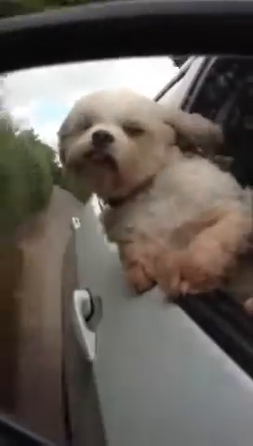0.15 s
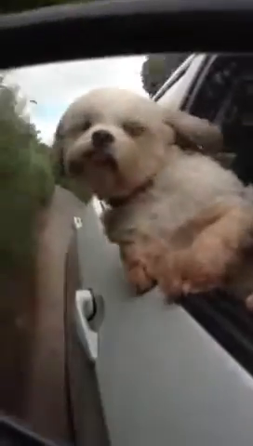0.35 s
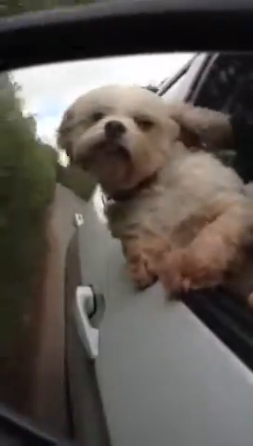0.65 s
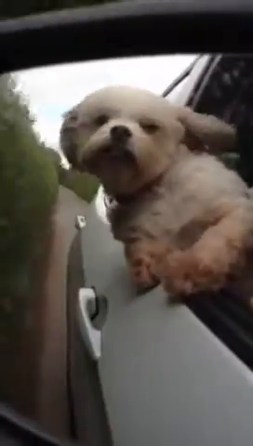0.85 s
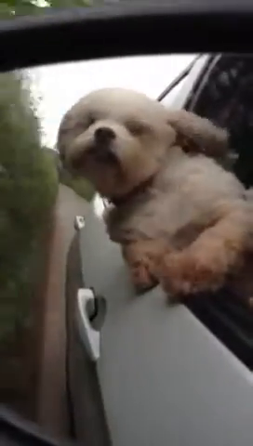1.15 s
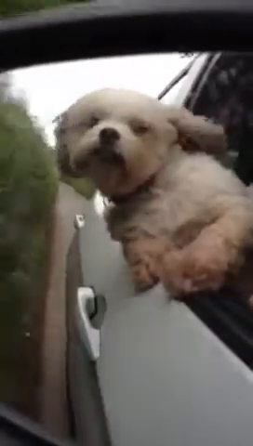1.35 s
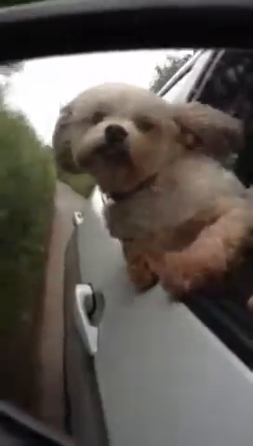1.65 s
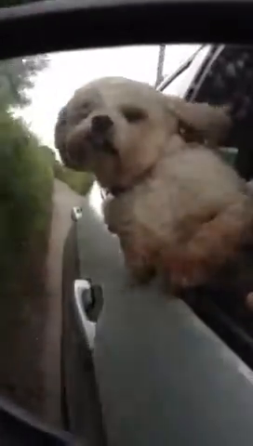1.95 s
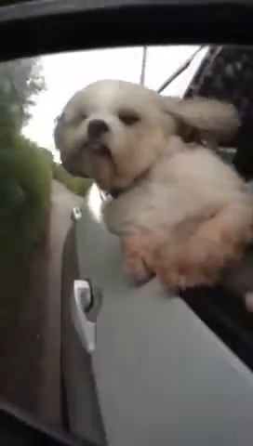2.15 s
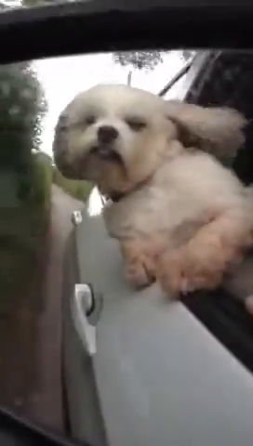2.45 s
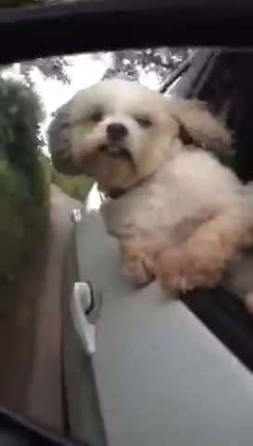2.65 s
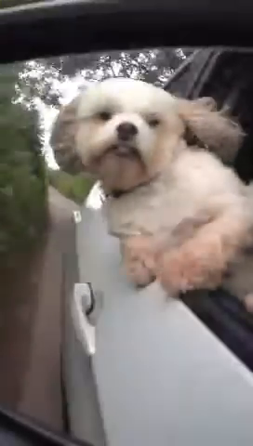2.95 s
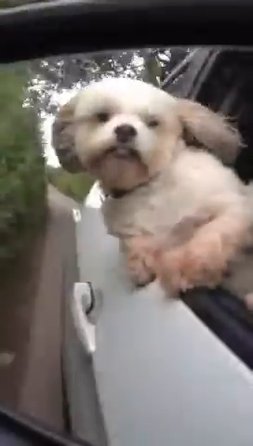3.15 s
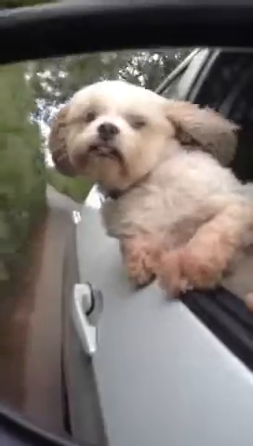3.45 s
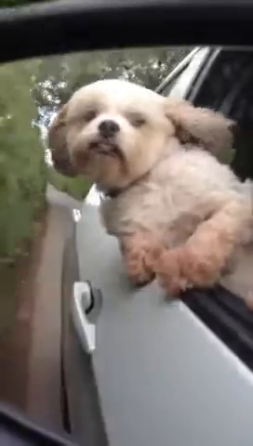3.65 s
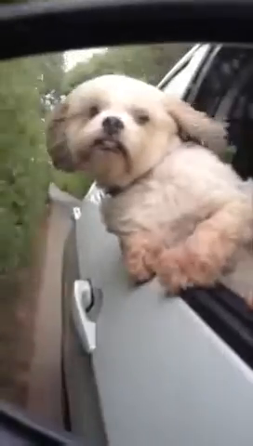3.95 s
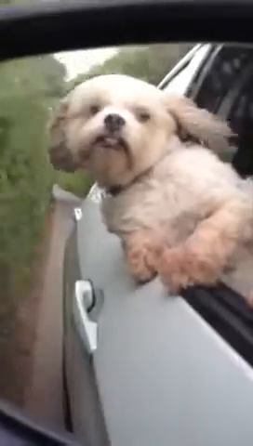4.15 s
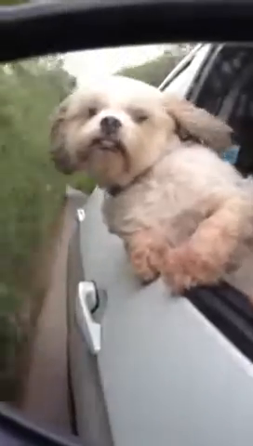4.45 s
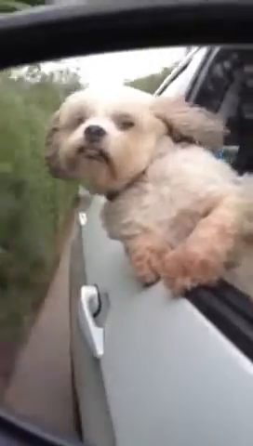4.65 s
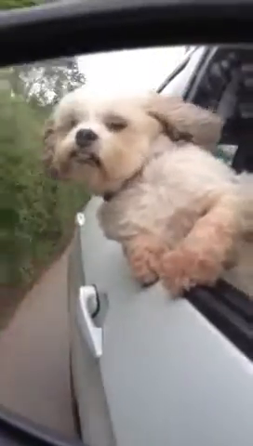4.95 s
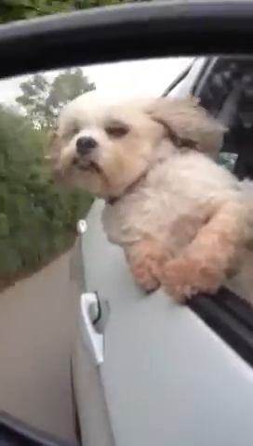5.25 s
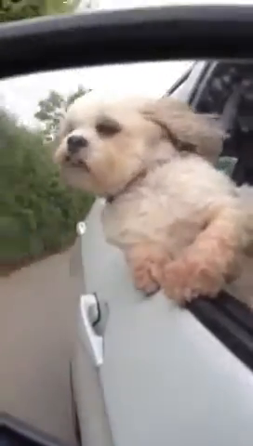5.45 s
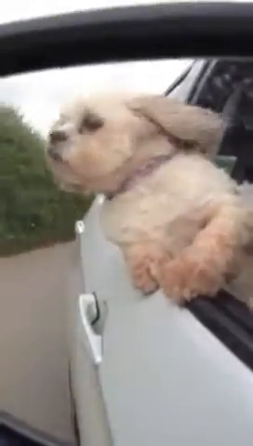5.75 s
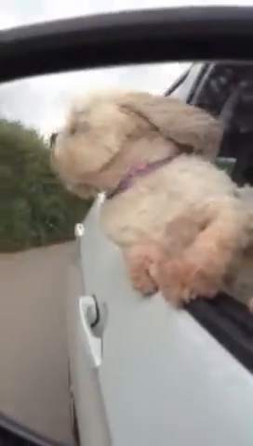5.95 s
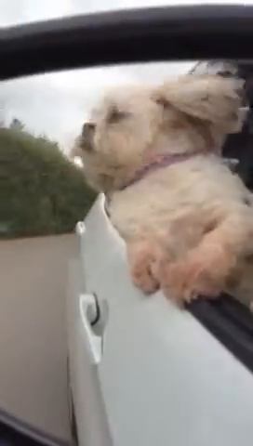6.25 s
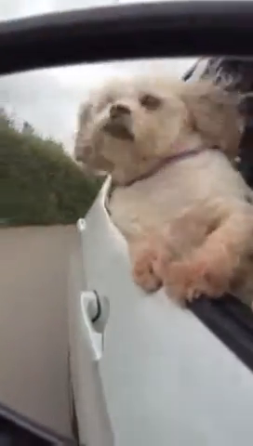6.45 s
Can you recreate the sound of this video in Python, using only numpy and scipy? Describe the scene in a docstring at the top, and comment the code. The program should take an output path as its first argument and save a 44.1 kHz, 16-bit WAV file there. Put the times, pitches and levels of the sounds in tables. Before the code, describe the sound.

Rough slipstream thumps and crackles past an open car window in uneven puffs, above low road rumble and faint hiss, slowly easing off.

```python
"""First heard is a deep, uneven buffeting: the slipstream at the open window of a moving car strikes a microphone.
It is turbulence, noise whose large and small eddies swell in short puffs between lulls and weaken as the car slows.
Sharp snaps are pressure steps that leak away; beneath lie tyre roar and hiss, slowly fading, slightly
wavering shaped noise.
The microphone rounds off the loudest peaks by saturation and cuts the deepest bass."""
import sys
import numpy as np
from scipy import signal
from scipy.fft import rfft, irfft, next_fast_len
from scipy.io import wavfile
from scipy.ndimage import uniform_filter1d, map_coordinates

SR = 44100
rng = np.random.default_rng(int(sys.argv[2]) if len(sys.argv) > 2 else 0)


def voltage_ratio(level):
    """Linear amplitude factor for a level in decibels (scalar or array-like)."""
    return 10 ** (np.asarray(level, float) / 20)


def master_out(mix):
    """Clip the mix to full scale and print it as 16-bit PCM to the path in sys.argv[1]."""
    frames = np.transpose(np.atleast_2d(mix))
    ceiling = np.clip(frames, -1, 1)
    pcm = np.round(ceiling * 32767).astype(np.int16)
    wavfile.write(sys.argv[1], SR, pcm)


N = 291060
TIME = np.arange(N) / SR  # s

# How deeply the level of each size of eddy follows a lull, dB per dB of its depth
LULL_SMALL, LULL_LARGE = 1.26, 1.6

# Relative mean spectrum of the turbulence at the port: (frequency [Hz], level [dB per Hz])
EDDY_SPECTRUM = [(15, -53), (25, -31), (59, -25), (152, 0.8), (227, 0.8), (330, -2.5), (500, -8),
                 (848, -14.5), (2000, -28.5), (5010, -45), (7500, -54), (9810, -65.5), (14300, -62.5),
                 (15500, -74)]
# Share of the level that follows the small eddies, the rest the large: (frequency [Hz], share [0 up, may pass 1])
SMALL_EDDY_SHARE = [(60, 0.18), (150, 0.047), (250, 0.16), (450, 0.47), (800, 0.78), (1600, 1.16),
                    (3200, 1.086), (8000, 1.18)]


def buffet(minor):
    """Turbulence as a cascade of eddy sizes: the finer the eddy, the more it follows the fast air."""
    calm_large_db, calm_small_db = -3.5, -2.5  # air between puffs, against the stream
    flutter = wobble(60)
    # Faster air tilts the treble up: dB per octave above 1.5 kHz, changing with each dB of stream
    bright = 1.07 + 0.59 * stream_change_db()

    # The offsets bring both levels to about zero in an average gust
    large = gusting(stream(column=1) + calm_large_db, minor, column=2, lull=LULL_LARGE, stretch=0.59)
    large = large + 15.5 + 1.57 * flutter
    small = gusting(stream(column=2) + calm_small_db, minor, column=1, lull=LULL_SMALL, stretch=0.6)
    small = small + 21 + 0.97 * flutter + 3.6 * wobble(200)
    small = np.minimum(small, 12)

    noise, out = rng.standard_normal(N), np.zeros(N)
    ticks = noise * voltage_ratio(8.5 * wobble(320) + 6.3 * wobble(400))  # fine eddies come as separate ticks
    ticks /= np.sqrt(np.abs(uniform_filter1d(ticks ** 2, size=350)))  # evens the energy over about 8 ms

    for hz in 30 * 2 ** (np.arange(19) / 2):  # half-octave steps
        share = along(SMALL_EDDY_SHARE, hz)
        ticking = np.clip(share - .3, 0, 1)
        air = np.sqrt(1 - ticking) * noise + np.sqrt(ticking) * ticks
        eddy = filtered(air, lambda f: eddy_band(f, hz) * voltage_ratio(along(EDDY_SPECTRUM, f)))
        # The puffs, more than chance, set the size of large eddies
        power = np.abs(uniform_filter1d(eddy ** 2, size=int(3 * SR / hz) + 200)) / np.mean(eddy ** 2)
        eddy /= (power + 0.099) ** (0.24 * (1 - ticking))
        tilt_db = bright * max(np.log2(hz / 1500), 0)
        level_db = (1 - share) * large + share * small + tilt_db + 1.06 * wobble(25)
        out += eddy * voltage_ratio(level_db)
    return voltage_ratio(5.5) * out


def eddy_band(f, hz):
    """Band-pass principle: a triangle on the log-frequency axis, half an octave to each side of hz."""
    return np.clip(1 - np.abs(2 * np.log2((f + 1) / hz)), 0, 1)


# Puffs at set times, strong and faint:
# (time [s], small-eddy level [dB], large-eddy level [dB], nominal length [ms])
SET_PUFFS = [(0.044, -19, -7.5, 7.9), (0.135, -16, -6, 7.1), (0.234, -19.5, -6, 15.3),
             (0.316, -12, -10, 10.9), (0.362, -10, -5, 4.2), (0.393, -13, -7, 18),
             (0.425, -16.0, -7.5, 9.9), (0.505, -13, -12.5, 5.2), (0.547, -16, -10, 13.3),
             (0.593, -15, -8, 5.1), (0.637, -16, -13.5, 5.0), (0.677, -15.5, -6.5, 6.6),
             (0.726, -6, -11, 5.9), (0.765, -19, -12, 3.6), (0.812, -16.0, -6, 6), (0.841, -14.5, -12, 21),
             (0.893, -19.5, -10.0, 4.1), (0.986, -15.5, -14, 17), (1.046, -14.5, -11, 16.1),
             (1.136, -10, -2.5, 4.6), (1.169, -11.5, -2, 4.7), (1.228, -18, -6.5, 5.4),
             (1.301, -15, -10.5, 6.0), (1.485, -15, -11.5, 3.4), (1.514, -15, -10.0, 4.8),
             (1.547, -16.5, -15.5, 10), (1.609, -27.5, -16, 7.7), (1.677, -10.5, -27.5, 5.8),
             (1.699, -14.5, -14.5, 5.5), (1.763, -14.5, -10, 8.2), (1.88, -12.5, -14, 11.8),
             (1.926, -10.5, -13, 3.9), (1.964, -15.5, -14.0, 11), (2.043, -18.5, -16.5, 23),
             (2.088, -17.5, -8, 7.9), (2.127, -16, -11.5, 2.8), (2.159, -16.5, -4.5, 7.4),
             (2.213, -24, -9, 6.8), (2.297, -15.5, -19, 5.6), (2.344, -16.5, -17.5, 3.1),
             (2.443, -13, -12.5, 4.9), (2.573, -6.5, -22, 2.7), (2.598, -14.5, -24, 4.0),
             (2.686, -15, -15, 6.8), (2.724, -15.5, -7.5, 3.8), (2.757, -22.5, -16, 3.9),
             (2.861, -19.5, -9.0, 21), (2.931, -16.5, -16.5, 5.3), (2.983, -14.5, -6, 6.7),
             (3.026, -18, -18.5, 8.2), (3.106, -11, -18.5, 5.9), (3.168, -21, -9, 5.1),
             (3.234, -16.5, -14.5, 4.9), (3.355, -20.5, -16.5, 20), (3.469, -12, -12, 7.7),
             (3.569, -21, -10.5, 27), (3.638, -20.5, -8.5, 9.1), (3.797, -18, -12.5, 6.7),
             (3.835, -20.5, -10.5, 9.8), (3.945, -15.5, -22, 3.1), (3.977, -23, -10.5, 4.8),
             (4.058, -23.5, -8.5, 13), (4.102, -20, -6.5, 6.6), (4.208, -24, -12, 4.1),
             (4.248, -16.5, -14, 6.2), (4.344, -20, -3, 5.6), (4.43, -22.5, -25, 4.1),
             (4.468, -19, -6, 8.7), (4.522, -12.5, -6.5, 3.8), (4.552, -29, -8.5, 3.2),
             (4.584, -18.5, -16, 8.4), (4.637, -19.5, -9.5, 13), (4.664, -16.5, -11, 4.4),
             (4.717, -32, -18, 2.4), (4.782, -23.5, -13.5, 11.6), (4.827, -24.5, -17, 22),
             (4.895, -28, -9, 13), (4.964, -23, -8, 7.0), (4.998, -26.5, -15, 6.1), (5.025, -21.5, -5, 5.8),
             (5.096, -20.5, -8, 15), (5.127, -32, -6, 4.9), (5.254, -16, -13.5, 4.1), (5.281, -28.5, -7, 4),
             (5.306, -33, -9, 3.5), (5.328, -19, -10, 11), (5.386, -32.5, -11, 2.1),
             (5.452, -27.5, -8.5, 5.3), (5.473, -26.5, -4.5, 6.6), (5.532, -26, -9, 7.2),
             (5.578, -34.5, -20, 3.4), (5.615, -18.5, -10.0, 11), (5.656, -32, -23.0, 2.3),
             (5.697, -18.5, -10, 6.5), (5.728, -27.5, -16, 6.2), (5.791, -21, -15.5, 3.9),
             (5.851, -19, -11.5, 4.2), (5.876, -29, -11, 7.9), (5.995, -20, -5, 7.4),
             (6.058, -24, -4.5, 7.2), (6.179, -36.5, -8.5, 6.8), (6.251, -24, -12, 13),
             (6.274, -21, -10, 4.4), (6.34, -15.5, -5, 9.6), (6.366, -22.5, -11, 4.7),
             (6.39, -19.5, -13.5, 3.7), (6.423, -18.5, -6, 9.7), (6.572, -18, -21, 5.3)]
# Brief drops of the air: (time [s], nominal depth [dB], nominal length [ms])
LULLS = [(0.202, 11, 4.5), (0.296, 5.5, 15), (0.451, 10, 11), (0.882, 0, 13), (1.117, 6, 17),
         (1.159, 7, 7.3), (1.217, 11.5, 7.9), (1.402, 9, 5.4), (1.577, 7, 11), (1.639, 33, 5.6),
         (1.74, 10.5, 41), (2.013, 7, 20), (2.185, 8.5, 30), (2.486, 5, 20), (2.645, 16, 4.5),
         (3.084, 10, 21), (3.154, 11.5, 9), (3.211, 19, 12), (3.307, 5.5, 17), (3.427, 3.5, 12.6),
         (3.523, 3.5, 10), (3.661, 9, 12), (4.041, 10.5, 4.7), (4.155, 28, 3.7), (4.388, 9.5, 3.8),
         (4.757, 6, 4.4), (4.799, 6, 9.7), (4.856, 8.5, 15.4), (4.943, 17, 8.5), (5.197, 22, 21),
         (5.294, 21, 9.9), (5.402, 16, 15), (5.499, 5.5, 19), (5.643, 9.5, 26.7), (5.754, 12.0, 13),
         (5.838, 12, 25), (5.945, 8, 14), (6.042, 15, 11), (6.156, 23, 13), (6.207, 14, 24.0),
         (6.407, 4, 7.3), (6.498, 6, 35)]


def gusting(calm_db, minor, column, lull, stretch):
    """Addition of powers: stream and lesser puffs, cut by lulls, plus the puffs at set times; gives dB."""
    def swells(puffs):
        return bells([(p[0], voltage_ratio(2 * p[column]), p[3]) for p in puffs], stretch)

    lull_gain = voltage_ratio(-2 * lull * bells(LULLS, stretch=0.71))
    power = (voltage_ratio(2 * calm_db) + swells(minor)) * lull_gain + swells(SET_PUFFS)
    return 10 * np.log10(power)


def minor_puffs():
    """Intermittency of turbulence: random puffs at uneven gaps, sized by the stream; rows as SET_PUFFS."""
    per_s = 24
    small_over_db, large_over_db, scatter_db = 7, 3.5, 3.5  # above the stream; scatter
    typical_ms = 7.05
    count = int(per_s * N / SR)
    s = (np.arange(count) + rng.random(count)) / per_s
    chance, at = rng.standard_normal((count, 3)), np.minimum((s * SR).astype(int), N - 1)
    small = stream(column=2)[at] + small_over_db + scatter_db * chance[:, 0]
    # Large eddies partly share the chance of the small ones
    large_chance = 0.59 * chance[:, 0] + 0.56 * chance[:, 1]
    large = stream(column=1)[at] + large_over_db + scatter_db * large_chance
    return np.transpose([s, small, large, typical_ms * np.exp(0.43 * chance[:, 2])])


# The weakening slipstream: (time [s], large-eddy level [dB], small-eddy level [dB])
SLIPSTREAM = [(0.0, -12, -19), (0.66, -11, -19), (0.99, -11.5, -24.5), (1.67, -11, -24), (2.85, -13, -25.5),
              (3.22, -14.5, -25.5), (3.69, -13.5, -31.5), (3.97, -16, -28), (6.6, -16, -40.5)]


def stream(column):
    """Mean flow under the turbulence: one column of the slipstream, a value per sample."""
    return np.interp(TIME, np.transpose(SLIPSTREAM)[0], np.transpose(SLIPSTREAM)[column])


def stream_change_db():
    """Decay of the mean flow: small-eddy level of the stream against its start, in dB."""
    return stream(column=2) - SLIPSTREAM[0][2]


# Pressure steps at set times, before a common gain: (time [s], level [dB])
SET_SNAPS = [(0.0471, -14), (0.1321, -9.5), (0.157, 0.5), (0.1797, -16), (0.3156, -8.5), (0.3627, -13.5),
             (0.3913, -7.5), (0.5496, -16), (0.5941, -13.5), (0.6144, -18.5), (0.6466, -15.5),
             (0.6728, -11.5), (0.6951, -18.5), (0.7644, -10.5), (0.861, -15.5), (0.9749, -21),
             (0.9877, -19.5), (1.0322, -14), (1.091, -22.5), (1.1337, -22.5), (1.1428, -17.0),
             (1.1857, -15.5), (1.2268, -13.5), (1.27, -27.5), (1.3025, -14), (1.4404, -22.5), (1.484, -13),
             (1.515, -21.5), (1.6772, -16.5), (1.7012, -27.5), (1.7987, -21.5), (1.8828, -15),
             (1.9656, -24), (2.0562, -22.5), (2.1287, -17.5), (2.1509, -24), (2.2119, -22), (2.5703, -8.5),
             (2.5975, -23), (2.7598, -20), (2.8111, -21.5), (2.9354, -19.5), (2.946, -20.5), (3.1069, -22),
             (3.1406, -20), (3.1708, -24.5), (4.5193, -28), (4.6126, -23), (4.7781, -26), (5.098, -26),
             (5.6143, -29.5), (5.6983, -28), (6.2505, -27.5), (6.3384, -36), (6.4392, -30.5),
             (6.5743, -26.5)]
# Colour the port gives a snap: (frequency [Hz], level [dB])
PORT_COLOUR = [(30, -28), (150, -3), (2000, 0.5), (7000, -7), (9500, -25), (12500, -13), (15500, -14)]


def snaps(minor):
    """Impulse into a leaky integrator: the edge of an eddy is a ragged pressure step that leaks away."""
    base_db, grows, scatter_db = -25.5, 0.86, 3  # puff snaps: dB at a -15 dB puff, dB per dB, scatter
    spread_s, follows = .005, 0.64  # scatter about the puff; fade with the stream, dB per dB
    leak_s = 0.0012
    blows = np.zeros(N)

    # Two further snaps go with each puff
    puff_s, puff_db = np.vstack([SET_PUFFS, minor] * 2).T[:2]
    chance = rng.standard_normal((len(puff_s), 2))
    puff_snap_db = base_db + grows * (puff_db + 15) + scatter_db * chance[:, 1]
    puff_snap_db += follows * np.interp(puff_s, TIME, stream_change_db())
    # Lulls hush only the snaps of the random puffs
    of_minor = np.arange(len(puff_s)) % (len(puff_s) // 2) >= len(SET_PUFFS)
    lull_db = np.interp(puff_s, TIME, bells(LULLS, stretch=1.4))
    puff_snap_db -= LULL_SMALL * lull_db * of_minor
    puff_snap_s = puff_s + spread_s * chance[:, 0]
    s, db = np.hstack([np.transpose(SET_SNAPS), [puff_snap_s, puff_snap_db]])

    # Each edge arrives in three parts within 1.6 ms
    late, size = rng.random((len(s), 3)), rng.standard_normal((len(s), 3))
    at = np.clip((s[:, None] + .0016 * (late - .5)) * SR, 0, N - 1).astype(int)
    size /= np.linalg.norm(size, axis=1, keepdims=True)
    np.add.at(blows, at, voltage_ratio(db + 16.5)[:, None] * size)

    def leak(hz):
        return 1 / (1 - np.exp(-1 / (SR * leak_s) - 2j * np.pi * hz / SR))

    return filtered(blows, lambda hz: leak(hz) * voltage_ratio(along(PORT_COLOUR, hz)))


# Relative spectrum of the tyres: (frequency [Hz], level [dB per Hz])
TYRE_SPECTRUM = [(35, -70.5), (60, -21.5), (129, 0.5), (226, -3.5), (433, -16), (800, -34), (1520, -36.5),
                 (3500, -52), (5000, -54.5), (6600, -59.5), (8500, -55.5), (10000, -66), (15500, -74)]
# Course of the tyre level, before a constant offset: (time [s], level [dB])
TYRE_LEVEL = [(0, -57.5), (3, -60), (4.5, -61), (5.55, -61.5), (5.7, -64), (6.6, -63.5)]


def road():
    """Broadband noise radiation: tyre roar and hiss thrown back by the hedge, fading with faint swells."""
    hiss = filtered(rng.standard_normal(N), lambda hz: voltage_ratio(along(TYRE_SPECTRUM, hz)))
    hiss /= np.std(filtered(hiss, lambda hz: (hz > 4000) & (hz < 8000)))  # unit level at 4-8 kHz
    band = filtered(hiss, lambda hz: np.exp(-((hz - 6000) / 1200) ** 2))
    hiss += .5 * band * voltage_ratio(3.5 * wobble(5))  # a band of the hiss wavers
    level_db = np.interp(TIME, *np.transpose(TYRE_LEVEL)) - 3.5 + 0.74 * wobble(8)
    return hiss * voltage_ratio(level_db)


def bells(rows, stretch):
    """Superposition of Gaussian swells, rows of (time [s], height, nominal length [ms])."""
    out, near = np.zeros(N), np.arange(-3000, 3000)
    for s, height, ms in rows:
        at = round(s * SR) + near
        inside = (at >= 0) & (at < N)
        width_s = stretch * np.clip(ms, 2, 50) / 1000
        out[at[inside]] += height * np.exp(-(near[inside] / SR / width_s) ** 2)
    return out


def along(points, hz):
    """Logarithmic frequency scale: (frequency [Hz], value) points read between on a log axis."""
    f, v = np.transpose(points)
    return np.interp(np.log(hz + 1), np.log(f + 1), v)


def wobble(rate):
    """Band-limited random modulation: a smooth curve through rate random knots a second."""
    return map_coordinates(rng.standard_normal(N // 100), [TIME * rate])


def filtered(x, response):
    """Linear filtering: the spectrum of x times a response of frequency."""
    m = next_fast_len(N + 8192)
    return irfft(rfft(x, m) * response(np.fft.rfftfreq(m, 1 / SR)), m)[..., :N]


def scene():
    """Superposition of pressures: buffeting, snaps and tyres add at one microphone port."""
    minor = minor_puffs()
    return (buffet(minor) + snaps(minor) + road())[None]


def top_cut(x):
    """Nothing passes above the cut-off."""
    return signal.sosfilt(signal.butter(12, 15710, fs=SR, output="sos"), x)


def record(dry):
    """Saturation, then a low shelf: peaks are rounded off below full scale and the deepest bass is cut."""
    top, hard = .74, 3.5  # ceiling as a share of full scale; sharpness of the bend
    rounded = dry / (1 + np.abs(dry / top) ** hard) ** (1 / hard)
    # The shelf falls below about 40 Hz and levels out near 12 Hz
    cut = filtered(rounded, lambda hz: np.sqrt(hz ** 2 + 150) / np.sqrt(hz ** 2 + 1600))
    return top_cut(cut)


dry = scene()
out = record(dry)
master_out(out)
```